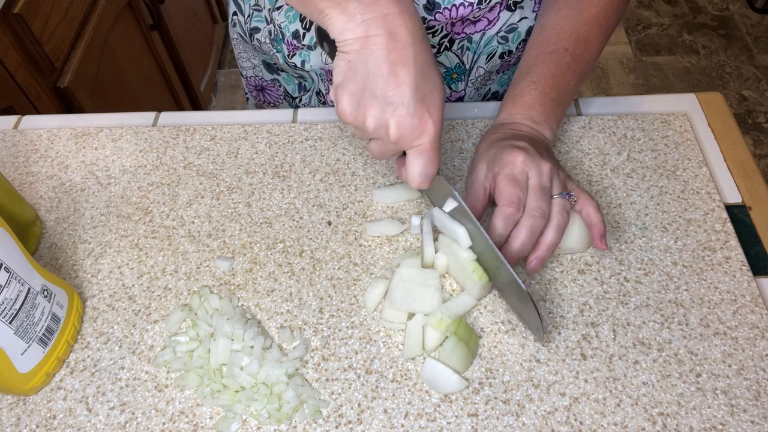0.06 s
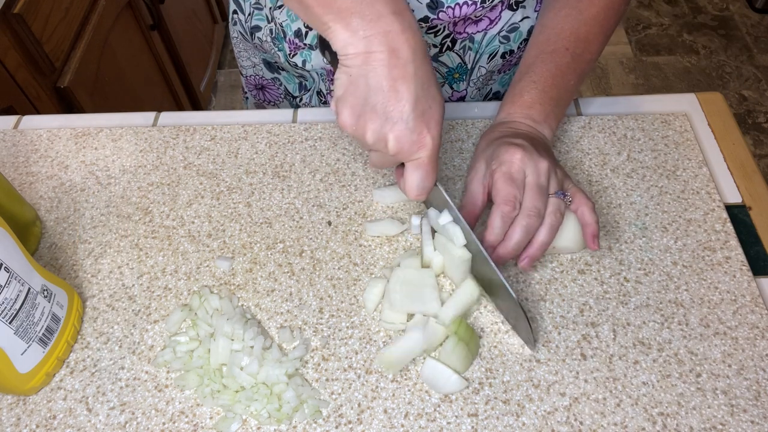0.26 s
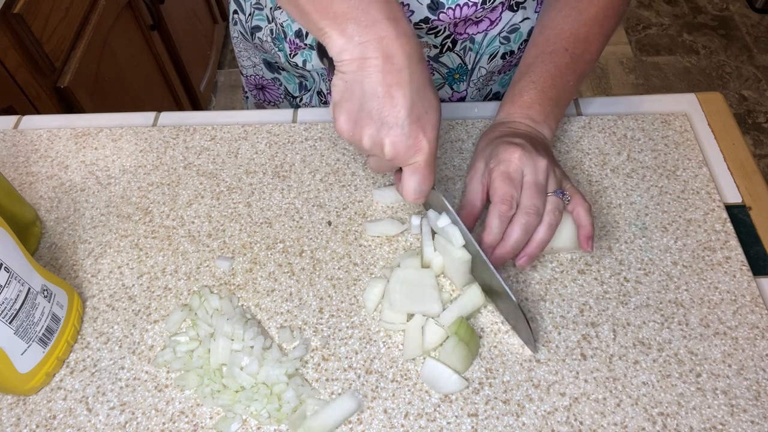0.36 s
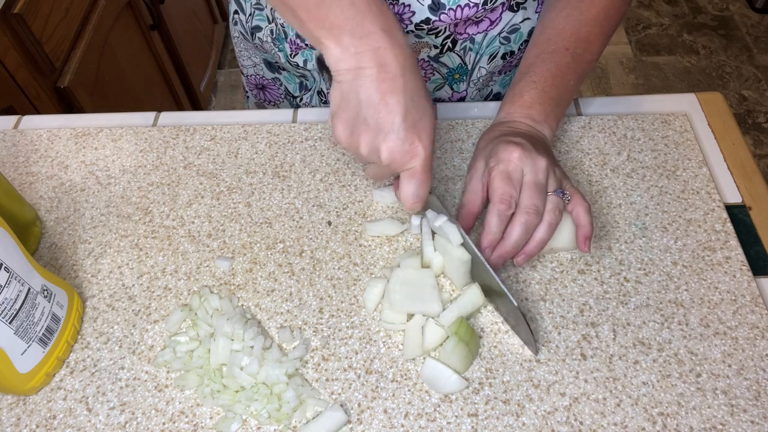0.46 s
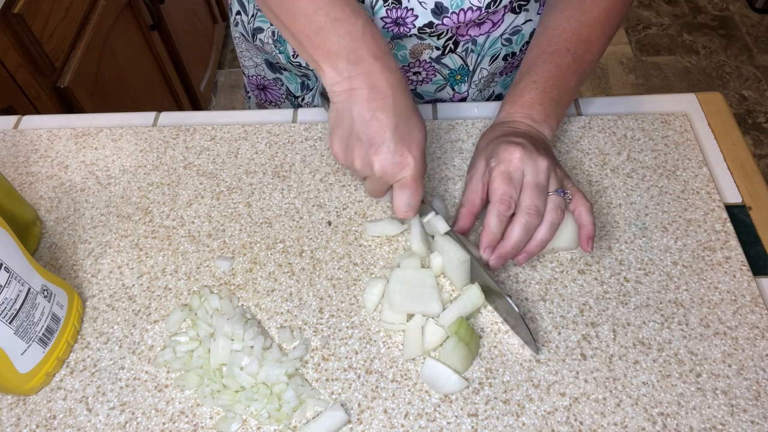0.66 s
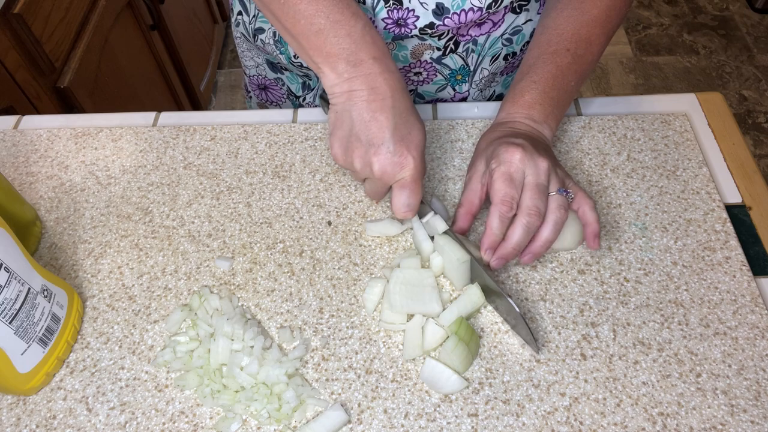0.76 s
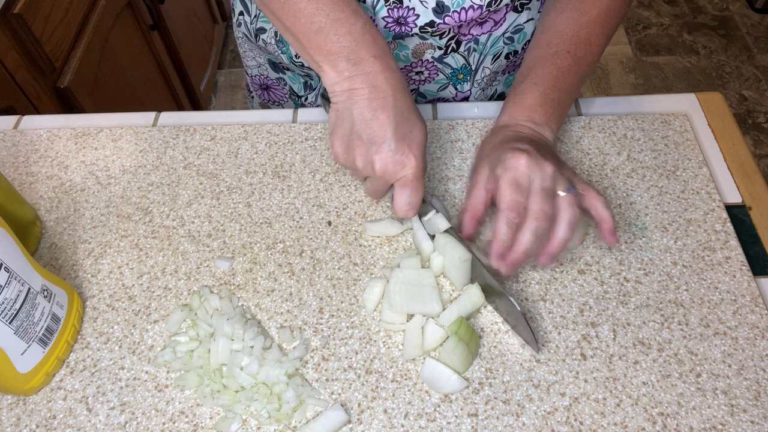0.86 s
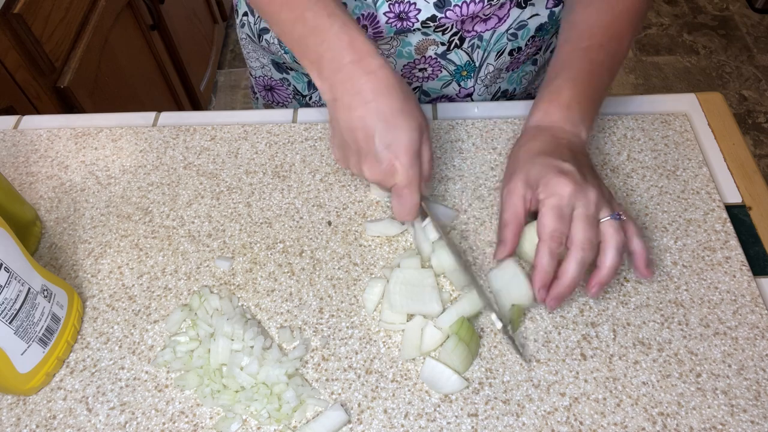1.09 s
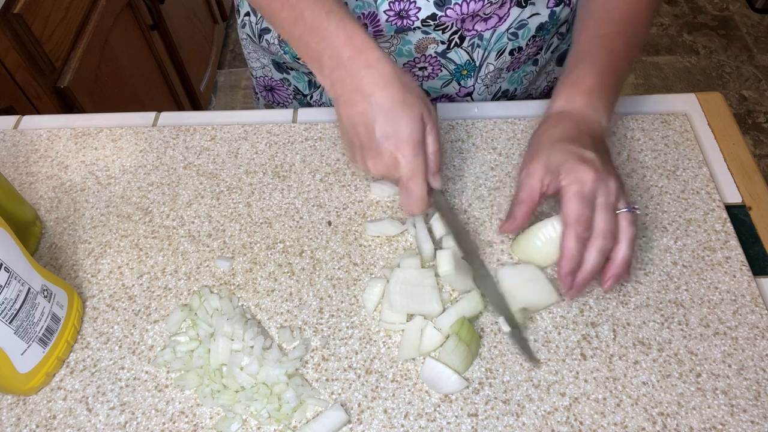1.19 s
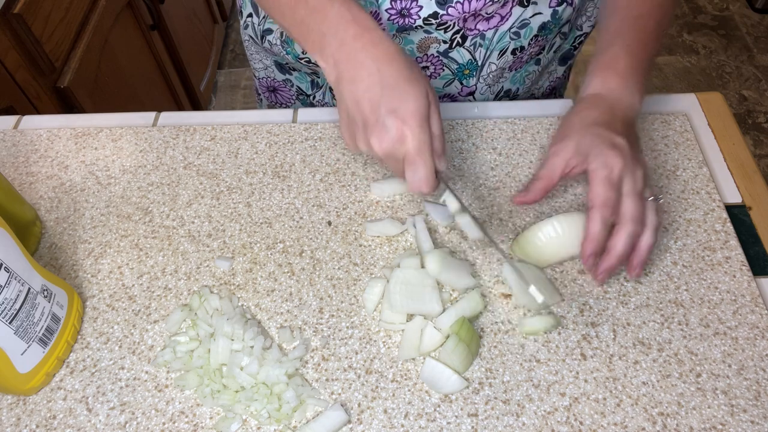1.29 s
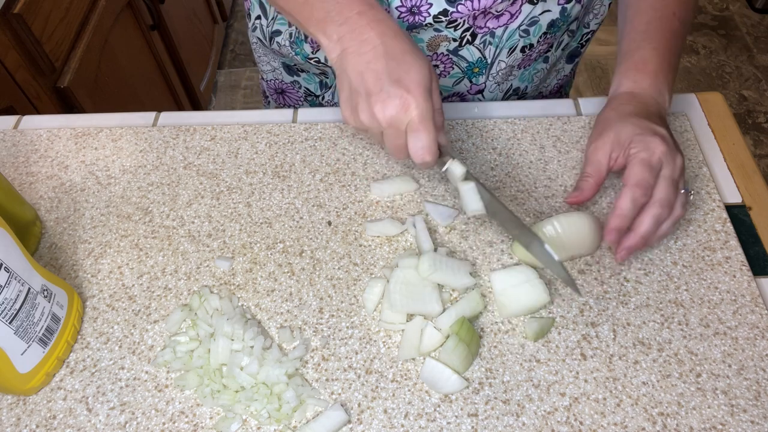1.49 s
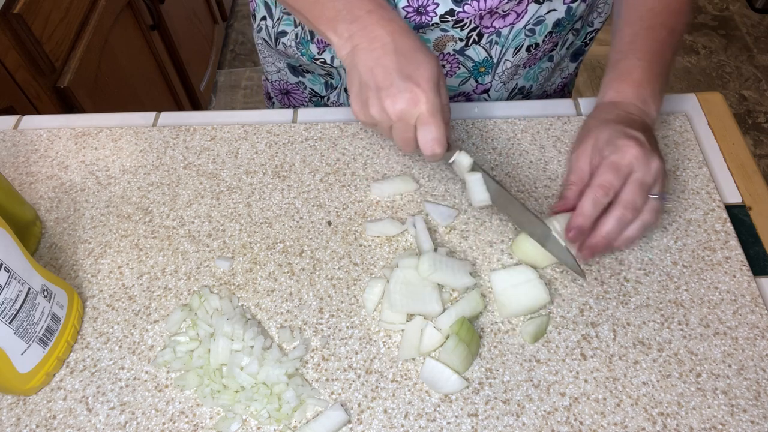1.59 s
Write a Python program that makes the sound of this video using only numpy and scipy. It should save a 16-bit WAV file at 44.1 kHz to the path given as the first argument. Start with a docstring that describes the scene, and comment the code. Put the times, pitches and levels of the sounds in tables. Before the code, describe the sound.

Close to the microphone in a small, hard-walled kitchen, a knife cuts through an onion with a crisp crunch and one loud knock. The blade scrapes softly over the counter with lighter taps and moist ticks, fading into quiet shuffling.

```python
"""A small hard kitchen, heard close to a laminate counter through two microphone ports.
A chef's knife crunches through an onion and slams down, ringing counter and blade, then drags sideways
with small knocks and wet ticks; a lighter shuffle follows. The rubbing is a stream of tiny slips.
Underneath, the counter shakes under the hands and the air hushes; knocks and ticks echo off the walls."""
import sys
import numpy as np
from scipy import signal
from scipy.fft import rfft, irfft
from scipy.io import wavfile

SR = 44100
rng = np.random.default_rng(int(sys.argv[2]) if len(sys.argv) > 2 else 0)


def persist_wave(psi):
    """Save psi, clipped to +-1, as 16-bit WAV."""
    counts = np.round(np.clip(psi, -1, 1) * 32767).astype(np.int16)
    wavfile.write(sys.argv[1], SR, np.atleast_2d(counts).T)


N = 72765

# Blade, onion and hands striking the counter. Each row: start in seconds, level in dB, centre of the
# contact's band in Hz, its half-width in octaves, left over right in dB.
BLOWS = [(0.076, -56.5, 110, 0.34, 0), (.145, -37, 666, 0.14, -0.5), (.161, -40, 585, 0.23, -3),
         (.2120, -29, 1400, 1, 4), (.2177, -17, 1800, 1, 4), (.2211, -16, 1600, 1, 3),
         (.2240, -18, 1900, 1, 3), (0.2269, -1.5, 1500, 2.2, 10), (.2290, -9.5, 1800, 1.35, 8),
         (0.23, -7.5, 1700, 0.51, -17.5), (.2316, -11, 950, 1.0, -8), (0.234, -26.5, 135, .9, 1.5),
         (0.2386, -24.5, 1386, .8, 14), (0.249, -25.5, 1310, 0.44, -10), (0.362, -44.5, 62, .4, 0),
         (0.423, -30.5, 1310, 0.1, -3), (0.5015, -20.5, 1460, 0.62, -3.5), (0.5022, -30, 588, 0.82, 4),
         (0.5943, -26.5, 1800, 0.18, -2), (0.5942, -31.5, 650, 0.44, -0.5), (.668, -31.5, 1223, 0.41, -5.5),
         (0.675, -46, 109.9, 0.455, 2.5), (.676, -33.5, 627, 0.47, -1), (0.707, -43.5, 62.5, 0.62, 9),
         (0.736, -40.5, 63.7, .5, 1.5), (.83, -49.5, 62.1, .4, 5), (1.0518, -40.5, 1340, 0.24, -2),
         (1.056, -51, 582, 0.18, -2.5), (1.099, -51, 900, 0.41, -2), (1.169, -54, 570, 0.31, -5.5),
         (1.31, -56.5, 569, 0.33, 0.5), (1.43, -56, 62.86, 0.46, 0.5)]
# Modes of counter and blade. Each row: frequency in Hz, level in dB, seconds to fall 60 dB.
BODY_MODES = [(62, -6, .15), (120, -6, .07), (230, -12, .05), (470, -3, .05), (580, -7, .05),
              (820, -4, .03), (1025, -1, .025), (1265, -1, .028), (1490, -1, .03), (1680, -2, .025),
              (1835, 0, .025), (2570, -5, .025), (2745, -5, .03), (3250, -8, .025), (3700, -10, .025),
              (4500, -8, .008), (5400, -6, .01), (6050, -3, .014), (6600, -5, .01)]
# Wet ticks of onion and blade edge. Each row: start in seconds, level in dB, tilt from 4 to 14 kHz in dB.
WET_TICKS = [(.017, -62, 8), (.0412, -55, 6), (.058, -62, 4), (.069, -57, -8), (.083, -52, 12),
             (.1322, -46, 10), (.1556, -43, -2), (.1612, -41, 2), (.2045, -36, 5), (.382, -42, -8),
             (.4068, -42, 0), (.4212, -40, 4), (.698, -47, -6), (.797, -66, 2), (.836, -50, -3),
             (.845, -52, 3), (.898, -58, 6), (1.325, -64, 5), (1.4215, -64, 2), (1.457, -58, 3),
             (1.543, -64, 6), (1.58, -65, 2), (1.6, -64, 2), (.1445, -29, 8), (.2175, -17, 3),
             (.2262, -12, -2), (.2295, -18, -8), (.4140, -23, -2), (.4348, -25, 1), (.5005, -19, 0),
             (.5930, -22, -1), (1.1693, -49, 2)]
# Blade and onion rubbing the counter. Each row: time in seconds, body level in dB, fizz level in dB.
RUB_LEVELS = [(0, -92, -70.5), (.065, -73.5, -73), (.14, -66, -72), (.146, -48.5, -53), (.19, -54.5, -54),
              (.203, -48.5, -53.5), (.214, -43.5, -35), (.226, -18, -31.5), (.236, -30, -37.5),
              (.26, -40, -59.5), (.31, -63, -70), (.38, -47.5, -58.5), (.43, -42, -54.5), (.48, -46, -49),
              (.54, -48.5, -54.5), (.62, -44.5, -53.5), (.64, -52.5, -54.5), (.665, -46.5, -49.5),
              (.685, -45.5, -56.5), (.70, -52, -70.5), (.76, -60, -75.5), (.82, -63, -91), (.832, -63, -63),
              (.845, -63, -60.5), (.86, -64, -75), (.90, -67, -68), (.95, -78, -81), (1.015, -88, -89.5),
              (1.028, -64, -83.5), (1.05, -61.5, -79.5), (1.09, -62, -71.5), (1.125, -61.5, -68),
              (1.15, -65, -80.5), (1.172, -73.5, -64.5), (1.195, -77.5, -84), (1.25, -80.5, -86.5),
              (1.42, -79, -90), (1.46, -73, -87.5), (1.52, -79.5, -93), (1.65, -81, -81.5)]
# The counter shaking. Each row: time in seconds, level in dB.
RUMBLE_LEVELS = [(0, -75.5), (.1, -66), (.2, -58.5), (.24, -34), (.3, -53), (.42, -59), (.5, -49.5),
                 (.55, -52.5), (.64, -54), (.75, -53), (.87, -62), (.97, -63.5), (1.01, -72), (1.07, -57),
                 (1.15, -65.5), (1.22, -58.5), (1.3, -64.5), (1.45, -63), (1.53, -69.5), (1.65, -66.5)]
# Spectra of ticks, rub body, rub fizz, rumble, air and echo. Each row: frequency in Hz, level in dB.
TICK_TONE = [(1500, -26), (3000, -4), (4500, 3), (5800, 6), (7500, 4), (9500, 0), (12000, -2), (14000, -4),
             (15700, -8), (16500, -20)]
RUB_BODY_TONE = [(250, -2.5), (400, -11), (600, -0.5), (900, -7), (1300, -7.5), (1900, -1.5), (2800, -9),
                 (5000, -16)]
RUB_FIZZ_TONE = [(3000, -7.5), (4300, -15), (6000, -0.5), (8000, -1), (11000, -2.5), (14000, -3),
                 (15600, -6), (16000, -27.5)]
RUMBLE_TONE = [(12, -52.5), (25, -25.5), (45, -5.5), (62, 2), (90, -3.5), (122, 3), (170, -7), (240, -6),
               (330, -16.5), (480, -9.5)]
AIR_TONE = [(18, -43.5), (30, -17), (86, -9), (314, -18.5), (562, -13), (694, -11.5), (2670, -30),
            (7670, -46.5), (11100, -36), (16500, -54)]
ROOM_TONE = [(100, -2.5), (450, 1.5), (1200, -4.5), (1800, -3), (2300, 1.5), (3500, 3.5), (6000, -0.5),
             (8000, -2.5), (14000, -10)]
# The kitchen's decay. Each row: frequency in Hz, seconds to fall 60 dB.
ROOM_T60 = [(100, 0.3), (400, 0.45), (1200, 0.5), (3000, .4), (6000, 0.42), (12000, 0.36)]
# How alike the two ports hear noise. Each row: frequency in Hz, correlation from 0 to 1.
PORT_LIKENESS = [(60, 0.88), (300, 0.39), (1000, 0.64), (3000, 0.22), (5500, 0.27), (6500, 0.4),
                 (8000, 0.3), (12500, 0.93), (15000, .7)]
# Phase between the ports. Each row: frequency in Hz, left minus right in radians.
PORT_PHASE = [(20, 0), (300, -.3), (1000, -.9), (1700, -1.2), (2400, -2.3), (3800, -3.3), (5200, -4.3),
              (6000, -4.2), (7200, -2.4), (8600, -2.2), (10000, -1.1), (12000, 0), (13600, 0), (15500, 2)]

CONTACT_CYCLES, REACH_FLOOR_DB = 0.4, -29.5  # rise in cycles of the band centre; weakest mode weighting
TICK_T60_S, TICK_RISE_S, CRACK_OVER_FIZZLE = .014, .0002, 4
SLIPS_PER_S, SLIP_SPREAD_DB, RING_SHARE = 3000, 4, 0.16
AIR_DB, ROOM_DB = -76, -14
CEILING, BAND_LIMIT_HZ = .95, 16500


def counter_blows():
    """Each blow lands on another spot, so the modes start in new phases; each port hears its own mix."""
    out = np.zeros((2, N))
    draws = rng.standard_normal((len(BLOWS), 3, len(BODY_MODES), 1))
    for (start, db, centre_hz, octaves, pan_db), draw in zip(BLOWS, draws):
        ring = body_ring(centre_hz, octaves, mode_gains=1 + .2 * draw[:2], phase_turns=draw[2])
        port_gains = gain_of(db + pan_db * np.array([[.5], [-.5]]))
        add(out, start, port_gains * ring / abs(ring).max())
    return out


def body_ring(centre_hz, octaves, mode_gains, phase_turns):
    """Counter and blade ring in damped modes, strongest in the band that the contact excites."""
    t = np.arange(8000) / SR
    hz, db, t60 = np.transpose(BODY_MODES)[:, :, None]
    reach_db = np.maximum(-6 * (np.log2(hz / centre_hz) / octaves) ** 2, REACH_FLOOR_DB)
    envelopes = mode_gains * gain_of(db + reach_db - 60 * t / t60)
    modes = envelopes * np.sin(2 * np.pi * (hz * t + phase_turns))
    rise = np.minimum(t * centre_hz / CONTACT_CYCLES, 1)
    return rise * modes.sum(axis=-2)


def wet_ticks():
    """Onion and blade edge give a sharp crack, then a short bright fizzle, a little to the right."""
    out, t = np.zeros(N), np.arange(1024) / SR
    fizzles = rng.standard_normal((len(WET_TICKS), len(t)))
    crack = CRACK_OVER_FIZZLE * signal.unit_impulse(len(t), 12)
    envelope = np.minimum(t / TICK_RISE_S, 1) * gain_of(-60 * t / TICK_T60_S)
    for (start, db, tilt_db), fizzle in zip(WET_TICKS, fizzles):
        tilt = [(4000, -tilt_db / 2), (14000, tilt_db / 2)]
        tick = envelope * coloured(coloured(fizzle + crack, TICK_TONE), tilt)
        add(out, start, gain_of(db) * tick / abs(tick).max())
    return out * gain_of([[-1], [1]])


def blade_rub():
    """Dense slips of uneven size ring counter and blade dully and fizz in the treble."""
    sizes = gain_of(SLIP_SPREAD_DB * np.minimum(rng.exponential(1, (2, N)), 5))
    slipping = rng.random((2, N)) < SLIPS_PER_S / SR
    slips = sizes * slipping * rng.choice([-1., 1.], (2, N))
    ring = body_ring(centre_hz=1200, octaves=0.53, mode_gains=1, phase_turns=0)
    ringing = unit_rms(signal.oaconvolve(slips, ring[None])[:, :N])
    scrape = coloured(slips, [(150, -42)] + RUB_BODY_TONE + [(8000, -37.5)])
    body = unit_rms(RING_SHARE * ringing + (1 - RING_SHARE) * scrape)
    fizz = coloured(slips + rng.standard_normal((2, N)), [(2000, -55.5)] + RUB_FIZZ_TONE)
    return at_ports(gain_curve(RUB_LEVELS, 1) * body + gain_curve(RUB_LEVELS, 2) * fizz)


def counter_rumble():
    """The counter shakes under the hands: low lumpy noise, much alike in both ports."""
    noise = coloured(rng.standard_normal((2, N)), RUMBLE_TONE + [(900, -72.5)])
    return gain_curve(RUMBLE_LEVELS, 1) * at_ports(noise)


def kitchen_echo(direct):
    """The hard walls return reflections of random sign, each band dying at its own speed."""
    taps = np.zeros((2, SR))
    arrivals = np.arange(200, SR - 20, 20) + rng.integers(0, 20, (2, (SR - 201) // 20))
    np.put_along_axis(taps, arrivals, rng.choice([-1., 1.], arrivals.shape), 1)
    taps[1] = 0.46 * taps[0] + 0.62 * taps[1]  # the right port shares part of the left's reflections
    hz, t, bands = signal.stft(taps, SR, nperseg=256)
    decay_db = at_hz(ROOM_TONE, hz)[:, None] - 60 * t / at_hz(ROOM_T60, hz)[:, None]
    tail = signal.istft(bands * gain_of(decay_db), SR, nperseg=256)[1]
    return signal.fftconvolve(direct, tail / np.linalg.norm(tail[0]), axes=1)[:, :N]


def kitchen_air():
    """A faint steady hush, mostly bass."""
    return gain_of(AIR_DB) * at_ports(coloured(rng.standard_normal((2, N)), AIR_TONE))


def at_ports(noises):
    """Of two unrelated noises, the ports share the first and differ by the second."""
    likeness = at_hz(PORT_LIKENESS, np.fft.rfftfreq(N, 1 / SR))
    mid = rfft(noises[0]) * np.sqrt((1 + likeness) / 2)
    side = rfft(noises[1]) * np.sqrt((1 - likeness) / 2)
    return irfft(np.array([mid + side, mid - side]), N)


def gain_of(db):
    return 10 ** (np.asarray(db) / 20)


def unit_rms(x):
    return x / np.sqrt(np.mean(x ** 2) + 1e-20)


def at_hz(table, hz):
    """A table's value along a log frequency axis."""
    table_hz, values = np.transpose(table)
    return np.interp(np.log(hz + 1), np.log(table_hz + 1), values)


def gain_curve(table, column):
    """A column of timed dB levels as a gain for every sample."""
    rows = np.array(table)
    return gain_of(np.interp(np.arange(N) / SR, rows[:, 0], rows[:, column]))


def add(mix, start_s, sound):
    part = mix[..., round(start_s * SR):][..., :sound.shape[-1]]
    part += sound[..., :part.shape[-1]]


def coloured(x, tone):
    """The signal shaped by a spectrum, at unit RMS."""
    hz = np.fft.rfftfreq(x.shape[-1], 1 / SR)
    return unit_rms(irfft(rfft(x) * gain_of(at_hz(tone, hz)), x.shape[-1]))


def scene():
    """Knife and counter close up, the kitchen behind; only blows and ticks feed the echo."""
    impacts = counter_blows() + wet_ticks()
    echo = kitchen_echo(gain_of(ROOM_DB) * impacts)
    return impacts + echo + blade_rub() + counter_rumble() + kitchen_air()


def record(dry):
    """The microphone: its ports differ in phase, loud peaks are rounded off, the top treble is cut."""
    padded = N + 1024
    hz = np.fft.rfftfreq(padded, 1 / SR)
    phase_shift = np.exp(1j * at_hz(PORT_PHASE, hz) * np.array([[.5], [-.5]]))
    pair = irfft(rfft(dry, padded) * phase_shift, padded)[:, :N]
    rounded = pair / (1 + (pair / CEILING) ** 4) ** .25
    lowpass = signal.firwin(511, BAND_LIMIT_HZ, window=("kaiser", 9), fs=SR)
    return signal.oaconvolve(rounded, lowpass[None], "same")


dry = scene()
out = record(dry)
persist_wave(out)
```